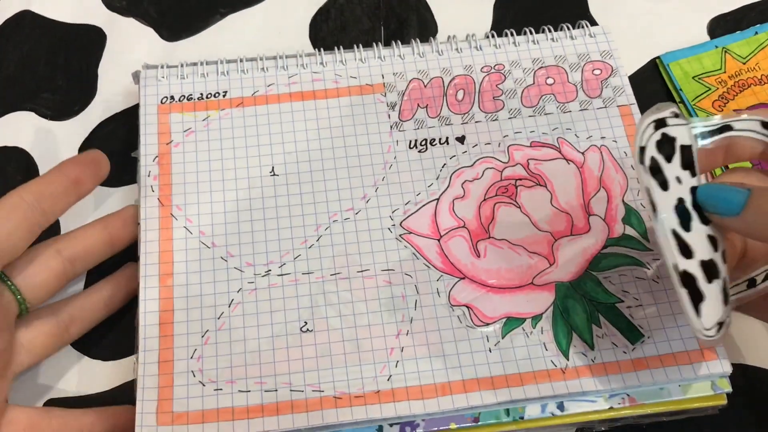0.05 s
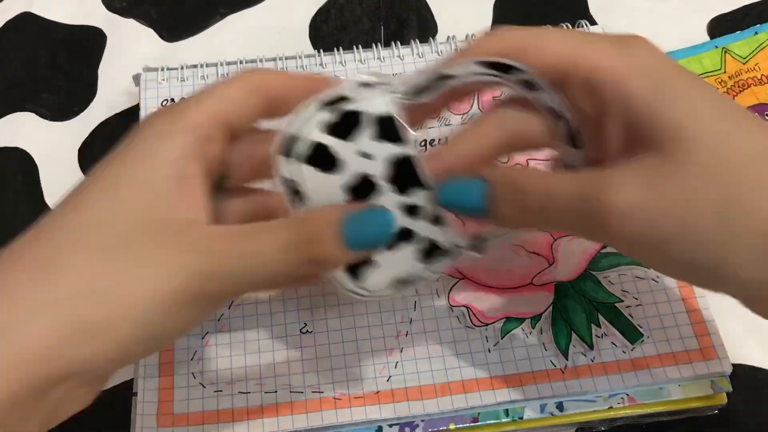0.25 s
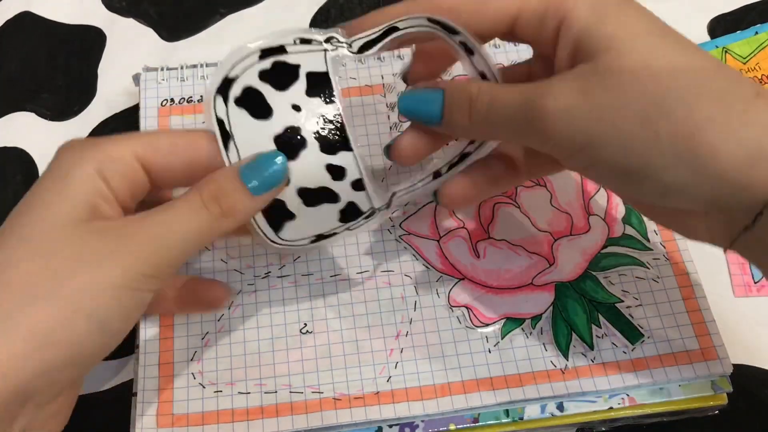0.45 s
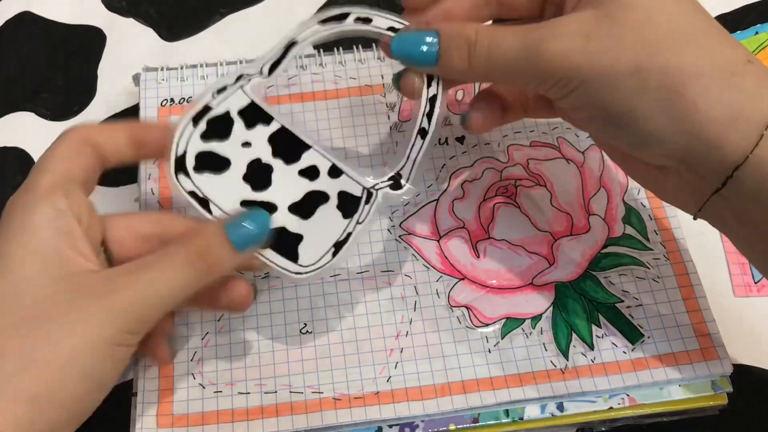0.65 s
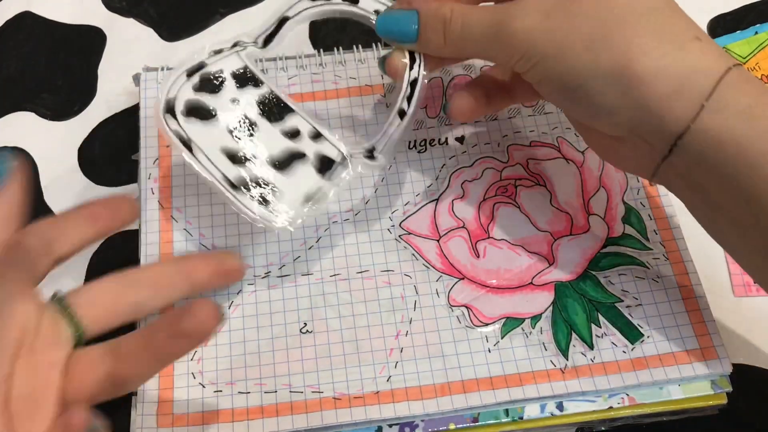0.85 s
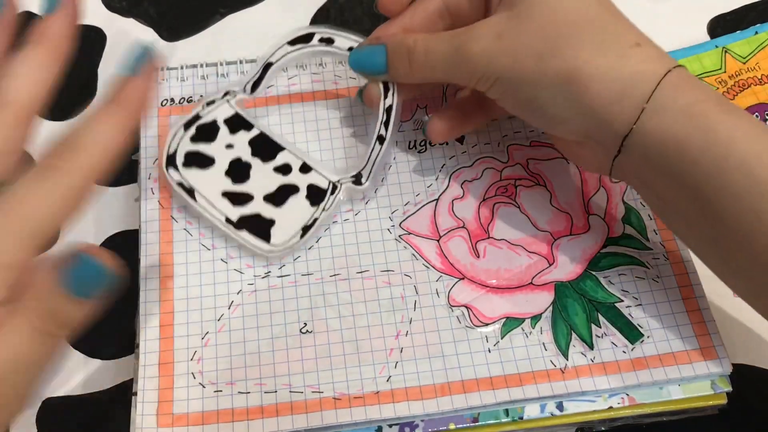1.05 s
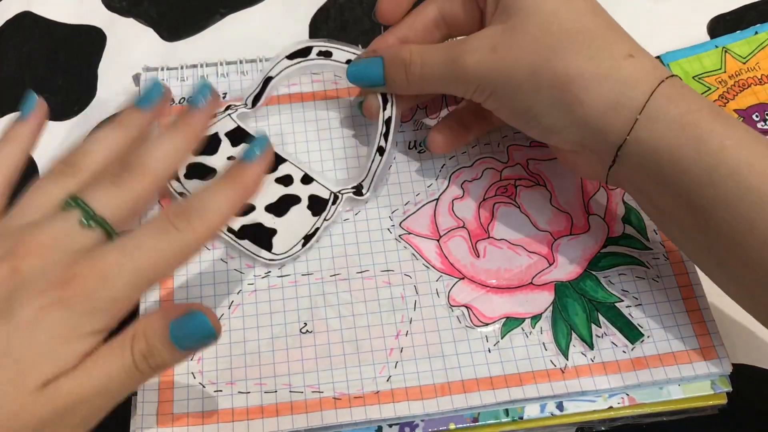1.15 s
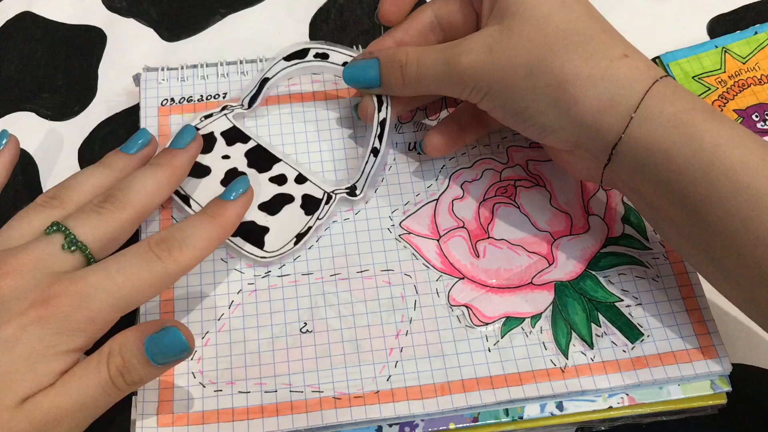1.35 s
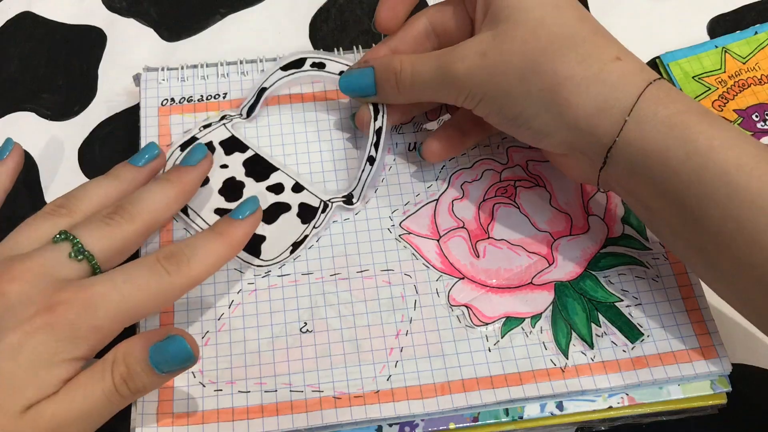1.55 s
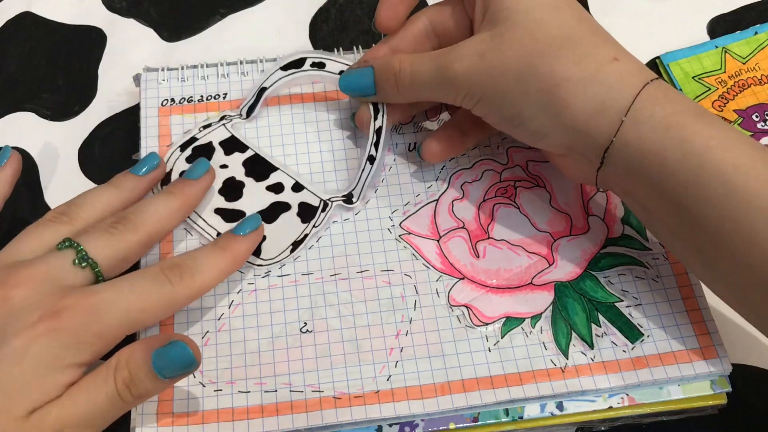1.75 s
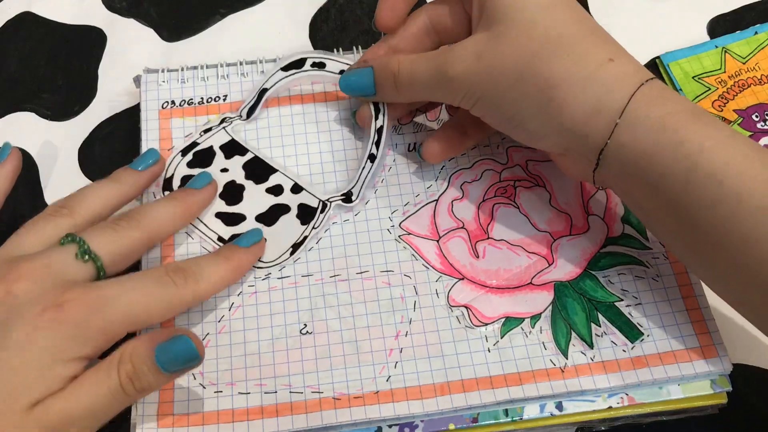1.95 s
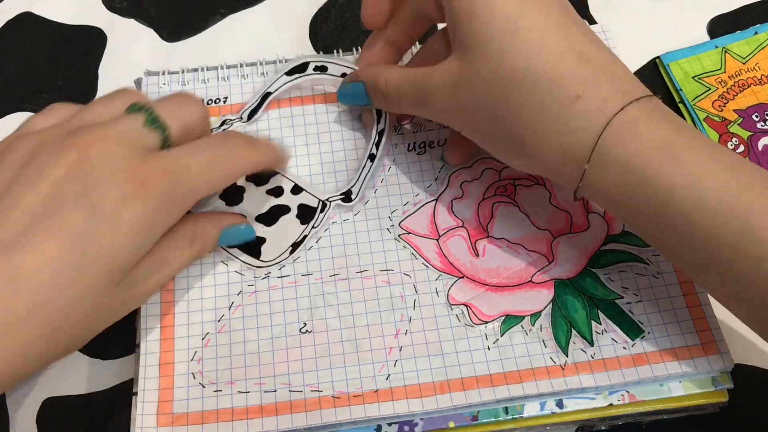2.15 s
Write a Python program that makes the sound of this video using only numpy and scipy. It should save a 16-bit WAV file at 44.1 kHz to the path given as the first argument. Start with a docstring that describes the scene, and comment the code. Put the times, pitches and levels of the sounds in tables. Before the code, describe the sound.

Close, dry paper crackling with sharp pops, short rustly drags and soft low flaps, followed by a cluster of light taps on a page; afterwards only faint finger rubs, a distant knock and quiet room air.

```python
"""Paper sticker handled over a notebook

A stiff paper sticker in a small, quiet room: finger drags are grip-modulated trains of tiny slips,
buckling snaps are pushes dispersed as bending waves, flaps are damped low thumps.
Edge taps lay it down as ticks; fingertip strokes are soft shaped noise.
A faint knock farther off is decaying modes plus noise; steady room air lies under it all."""
import sys
import numpy as np
from scipy import signal
from scipy.fft import rfft, irfft, next_fast_len
from scipy.io import wavfile

SR = 44100
rng = np.random.default_rng(int(sys.argv[2]) if len(sys.argv) > 2 else 0)


def generate_wav(sig):
    """Save sig (samples, or channels by samples) to the path in sys.argv[1] as 16-bit PCM at SR."""
    pcm = np.round(np.clip(np.atleast_2d(sig).T, -1, 1) * 32767).astype(np.int16)
    wavfile.write(sys.argv[1], SR, pcm)


N = 97020


def amp(db):
    """Amplitude of a level in dB."""
    return 10 ** (np.asarray(db) / 20)


def unit_rms(x):
    """Scale to rms 1."""
    return x / np.sqrt(np.mean(x ** 2) + 1e-20)


def unit_energy(x):
    """Scale to energy 1."""
    return x / np.linalg.norm(x)


def along(points, hz):
    """Interpolate (freq_hz, value) points on a log frequency axis."""
    point_hz, value = np.transpose(points)
    return np.interp(np.log(hz + 1), np.log(point_hz + 1), value)


def filtered(x, response):
    """Multiply the spectrum of x by a zero-phase response of frequency."""
    size = next_fast_len(N + SR // 2)
    hz = np.fft.rfftfreq(size, 1 / SR)
    return irfft(rfft(x, size) * response(hz), size)[:N]


def coloured(x, spectrum):
    """Shape x by a (freq_hz, level_db) spectrum, at rms 1."""
    return unit_rms(filtered(x, lambda hz: amp(along(spectrum, hz))))


def add(out, start_s, x):
    """Mix x into out at start_s."""
    part = out[max(round(start_s * SR), 0):][:len(x)]
    part += x[:len(part)]


# steady air spectrum: freq_hz, density_db (relative, per Hz)
AIR_SPECTRUM = [(25, -47), (50, -18.5), (84, 2.5), (125, -2.5), (170, -6.5), (230, -3.5), (400, -5.5),
                (650, -10.5), (900, -13.5), (1400, -16.5), (2800, -19.5), (5000, -22.5), (8000, -25),
                (12000, -26), (16000, -30)]
AIR_DB = -68.5


def room_air():
    """Steady air of the room: stationary coloured noise."""
    return amp(AIR_DB) * coloured(rng.standard_normal(N), AIR_SPECTRUM)


def burst(life_s, size=4096):
    """Exponentially dying noise of energy 1; life_s is the 1/e time."""
    decay = np.exp(-np.arange(size) / SR / life_s)
    return unit_energy(rng.standard_normal(size) * decay)


BEND_LAG_1KHZ_S, BEND_POWER = 0.000596, 1.01  # lag grows toward the bass by this power
PATCH_HALF_WIDTH_OCTAVES = 0.26


def bend(push, spectrum, bright_db_per_octave=0, patch_hz=None, patch_db=0, size=8192):
    """Bending wave in the sheet: the coloured push arrives treble first, bass last, at energy 1."""
    hz = np.fft.rfftfreq(size, 1 / SR)
    khz = np.maximum(hz, 70) / 1000
    level_db = along(spectrum, hz) + bright_db_per_octave * np.log2(np.maximum(khz, 1))
    if patch_hz:
        octaves_off = np.log2((hz + 1) / patch_hz)
        level_db = level_db + patch_db / (1 + (octaves_off / PATCH_HALF_WIDTH_OCTAVES) ** 2)
    # minimum phase: fold the cepstrum onto positive time
    cepstrum = irfft(np.log(amp(level_db)))
    cepstrum[1:size // 2] *= 2
    cepstrum[size // 2 + 1:] = 0
    # phase lag = integral of the group delay
    lag_rad = 2 * np.pi * np.cumsum(BEND_LAG_1KHZ_S / khz ** BEND_POWER) * SR / size
    response = np.exp(rfft(cepstrum) - 1j * lag_rad)
    return unit_energy(irfft(rfft(push, size) * response)[:size // 2])


# low body of a snap or tap: freq_hz, density_db (relative, per Hz)
BODY_SPECTRUM = [(25, -50), (60, -26.5), (150, -10), (330, -5.5), (550, 3.5), (760, -4), (900, -3),
                 (1400, -9), (2500, -32.5), (8000, -50.5)]
LEAD_LIFE_S, LEAD_DB, LEAD_SAMPLES = 0.00078, -3.5, 256  # fibres slip before the push
FIBRE_LIFE_S, FIBRE_DB = 0.00082, -6  # fibres give way after it
RING_LIFE_S, RING_DB = 0.0072, -10.5  # the sheet rings on
SPRAY_DB_PER_DB, SPRAY_FULL_DB = 0.092, -8  # stronger clicks tear more fibres; 0 dB spray gain at FULL


def click(energy_db, spectrum, bright_db_per_octave, body_db, patch_hz=None, patch_db=0):
    """Fibres slip ever harder, one sharp push follows, and the spray dies into a short ring."""
    spray = amp(SPRAY_DB_PER_DB * (energy_db - SPRAY_FULL_DB))
    before = spray * amp(LEAD_DB) * burst(LEAD_LIFE_S, size=LEAD_SAMPLES)[::-1]
    after = spray * amp(FIBRE_DB) * burst(FIBRE_LIFE_S) + amp(RING_DB) * burst(RING_LIFE_S)
    after[0] = 1
    push = unit_energy(np.concatenate([before, after]))
    crack = bend(push, spectrum, bright_db_per_octave, patch_hz, patch_db)
    body = amp(body_db) * bend(push, BODY_SPECTRUM)
    return amp(energy_db) * (crack + body)


# buckling snaps, energy before body is added:
# push_s, energy_db, bright_db_per_octave (above 1 kHz), body_db (re crack), patch_hz, patch_db
SNAPS = [(0.0394, -42, 0, -20, 4200, 9), (.093, -39, 1.5, -12, 12500, 2),
         (0.1064, -31.5, -1, -7, 11700, 5.5), (0.1238, -37.5, -3, -2, 7500, 29),
         (0.1509, -24.5, 11, -38, 11300, 6), (0.2024, -28.5, 3.5, -39, 6300, 21),
         (.2055, -26, 1, -42, 4560, 9), (.213, -29.5, 3, -27, 11840, 1), (0.2199, -29, 7, -22, 9500, 3),
         (0.2421, -15, 2.5, -6.5, 3080, 10), (0.245, -19, -2.5, -8.5, 6000, 11),
         (.2477, -19, -1.5, -27, 11000, 5.5), (.299, -38, 2.5, -20, 11040, -6),
         (.307, -29.5, 1, -26, 14100, 9), (0.3337, -27, 1, -2.5, 2240, 6), (0.3426, -30, 0, -11, 12900, -5),
         (.362, -25.5, 1.5, -8.5, 2000, 8.5), (.374, -28, 4, -23, 12000, -1),
         (0.3809, -26, 0, -30, 6000, 9), (0.4057, -17, -1, -18, 12470, 9), (.408, -14, 2, -25, 6400, 5),
         (0.4184, -4.5, -2, -16, 2700, 3), (0.4308, -18, 3.5, -4, 2490, 18),
         (0.4338, -13.5, 5.5, -26, 13500, 11), (0.4524, -9, 2.5, -12, 2910, 10.5),
         (0.475, -20, 1, -28, 15000, -1), (0.4797, -8, 3, -14.5, 2700, -1),
         (.513, -35.5, 1, -19.5, 11000, 3), (0.5489, -34, -0.5, -29, 12000, 2),
         (0.5693, -24.5, -1.5, -11.5, 3013, 12), (.580, -18, 1.5, -10.5, 12500, 5),
         (.594, -29, 4.5, -20, 14000, 3), (0.6048, -18, 2, -37, 13500, 21),
         (.611, -22, 4, -27.5, 13500, 13), (0.618, -23, 10, -32, 13100, 12),
         (0.6339, -8, 2, -15.5, 2630, 1.5), (.648, -25, 4.5, -12.5, 12000, 3),
         (0.652, -32, 8, -30, 13500, 6), (0.655, -14.5, -3, -26, 5370, 31),
         (0.6598, -12.5, -2, -25, 7500, 21), (0.6607, -2, -1, -14.5, 14940, 11.5)]
# crack of the sheet: freq_hz, density_db (relative, per Hz)
CRACK_SPECTRUM = [(300, -46.5), (1400, -15.5), (1750, 2), (3000, 2.5), (3700, -0.5), (5400, 1),
                  (6800, -8.5), (9000, 0), (12000, 0.5), (15800, -2), (18000, -38)]
# sheet modes, before scatter: freq_hz, level_db (relative), t60_s
SHEET_MODES = [(533, -3.5, 0.15), (729.3, -2, 0.12), (2060, -6, .06), (3050, 2, .08)]
SHEET_DB = -23  # sheet ring re snap
MODE_SCATTER_DB, MODE_SCATTER_RATIO = 2, 0.0091  # standard deviations of level, pitch


def sheet_ring():
    """Decaying modes of the whole sheet, scattered per snap, at energy 1."""
    t = np.arange(SR // 5) / SR
    ring = np.zeros(len(t))
    for freq_hz, level_db, t60_s in SHEET_MODES:
        level = amp(level_db + MODE_SCATTER_DB * rng.normal() - 60 * t / t60_s)
        mode_hz = freq_hz * (1 + MODE_SCATTER_RATIO * rng.normal())
        ring += level * np.sin(2 * np.pi * mode_hz * t)
    return unit_energy(ring)


def snaps():
    """A patch of the sticker buckles as a dispersed click and the whole sheet rings faintly."""
    out = np.zeros(N)
    for push_s, energy_db, bright_db_per_octave, body_db, patch_hz, patch_db in SNAPS:
        crack = click(energy_db, CRACK_SPECTRUM, bright_db_per_octave, body_db, patch_hz, patch_db)
        add(out, push_s - LEAD_SAMPLES / SR, crack)
        add(out, push_s, amp(energy_db + SHEET_DB) * sheet_ring())
    return out


# drags, final level before grip:
# release_s, buildup_s, final_db, swell_db, bright_db_per_octave (above 1 kHz)
DRAGS = [(0.155, 0.055, -55.5, 4, 0.5), (0.2441, 0.021, -35.5, 26.5, -1.5), (.409, 0.054, -49, 4.5, 0.5),
         (0.479, 0.051, -46, 7.5, -3), (0.581, 0.015, -48, 9.5, 0.5), (.633, 0.067, -49.5, 15.5, 1.5),
         (0.642, .009, -35, -1.5, 2), (0.663, 0.022, -33, 7.5, 1), (0.773, 0.023, -66, 4, -3.5),
         (0.877, 0.02, -60.5, 24, -5), (1.81, .06, -76, 1, 5.5), (2.163, 0.057, -70.5, 10, 0.5)]
# slips of paper under fingers: freq_hz, density_db (relative, per Hz)
DRAG_SPECTRUM = [(100, -17.5), (600, -5.5), (1300, -9), (2000, -5.5), (3800, -2), (5400, -0.5), (7000, 1),
                 (9500, -1.5), (13000, 3), (16000, -1)]
SLIPS_PER_S, SLIP_SPREAD_DB = 6000, 6.5
GRIP_PER_S, GRIP_SPREAD_DB = 350, 3  # grip catches and eases
EDGE_FADE_S = 0.0016  # 1/e fade outside the build-up


def drags():
    """Dense tiny slips change level by swell_db as the paper is pulled, and stop when it lets go."""
    out, t = np.zeros(N), np.arange(N) / SR
    for release_s, buildup_s, final_db, swell_db, bright_db_per_octave in DRAGS:
        outside_s = np.maximum(release_s - buildup_s - t, 0) + np.maximum(t - release_s, 0)
        swell = amp(final_db + swell_db * np.minimum((t - release_s) / buildup_s, 0))
        knots = rng.standard_normal(int(N * GRIP_PER_S / SR) + 2)
        grip = amp(GRIP_SPREAD_DB * np.interp(t * GRIP_PER_S, np.arange(len(knots)), knots))
        slip_here = rng.random(N) < SLIPS_PER_S / SR
        slip_size = amp(SLIP_SPREAD_DB * np.clip(rng.standard_normal(N), -2, 2))
        slips = slip_here * slip_size * np.sign(rng.standard_normal(N))
        spectrum = [(hz, db + bright_db_per_octave * np.log2(max(hz / 1000, 1)))
                    for hz, db in DRAG_SPECTRUM]
        out += swell * np.exp(-outside_s / EDGE_FADE_S) * grip * coloured(slips, spectrum)
    return out


# whole sheet springs over: start_s, energy_db, pitch_hz
FLAPS = [(.2425, -21.5, 138), (.334, -25.5, 400), (.419, -30, 150), (.432, -32, 120), (.4795, -24, 124),
         (0.582, -31.5, 150), (.635, -28.5, 170), (0.6627, -20.5, 126)]
FLAP_Q, FLAP_TOP_HZ = 1.5, 604
WOBBLE_LIFE_S, WOBBLE_DB = 0.015, -11  # brief wobble after the push


def flaps():
    """The sheet springs over and shoves the air: a heavily damped low thump."""
    out, hz = np.zeros(N), np.geomspace(20, 16000, 60)
    for start_s, energy_db, pitch_hz in FLAPS:
        push = amp(WOBBLE_DB) * burst(WOBBLE_LIFE_S)
        push[0] = 1
        resonance = 1 + (FLAP_Q * (hz / pitch_hz - pitch_hz / hz)) ** 2
        top_cut = 1 + (hz / FLAP_TOP_HZ) ** 4
        thump_db = -10 * np.log10(resonance * top_cut)
        add(out, start_s, amp(energy_db) * bend(push, np.column_stack([hz, thump_db])))
    return out


# sticker edge on the page, energy before body is added:
# push_s, energy_db, bright_db_per_octave (above 1 kHz), body_db (re tick)
TAPS = [(0.8125, -36.5, -5.5, -7), (.822, -33.5, 17, -12), (.852, -34, -2, -13), (0.8586, -32, 1, -25),
        (0.865, -30.5, -2.5, -9.5), (0.8679, -32, -4.5, -14), (0.8723, -21, 1.5, -24),
        (0.8745, -22, -0.5, -16), (0.8783, -31.5, -6, 2), (1.8883, -50.5, 9, -20)]
# tick of the edge: freq_hz, density_db (relative, per Hz)
TAP_SPECTRUM = [(300, -29), (1400, -5), (2500, -3), (4000, -0.5), (5800, 2), (7800, 2), (10000, -5.5),
                (15500, -14), (18000, -50)]


def taps():
    """The sticker's edge taps down on the notebook: a cluster of ticks, then a late faint one."""
    out = np.zeros(N)
    for push_s, energy_db, bright_db_per_octave, body_db in TAPS:
        tick = click(energy_db, TAP_SPECTRUM, bright_db_per_octave, body_db)
        add(out, push_s - LEAD_SAMPLES / SR, tick)
    return out


# fingertip strokes: middle_s, half_length_s, peak_db
STROKES = [(1.464, 0.023, -64), (2.18, .06, -76)]
# skin on paper: freq_hz, density_db (relative, per Hz)
SKIN_SPECTRUM = [(300, -14), (2700, -15), (3500, 1), (4300, -1.5), (5300, -10), (7200, -7.5), (10000, -17),
                 (16000, -27)]


def smoothing():
    """A fingertip slides softly over the sticker: friction noise that swells and fades."""
    t = np.arange(N) / SR
    level = np.zeros(N)
    for middle_s, half_length_s, peak_db in STROKES:
        level += amp(peak_db) / (1 + ((t - middle_s) / half_length_s) ** 2)
    return level * coloured(rng.standard_normal(N), SKIN_SPECTRUM)


# modes of the knocked object: freq_hz, level_db (relative), t60_s
KNOCK_MODES = [(411, 2.5, 0.17), (1000, 4, 0.1), (1100, -6, 0.17), (1610, -12, 0.16), (1930, -8.5, .14)]
# diffuse part of the knock: freq_hz, density_db (relative, per Hz)
KNOCK_SPECTRUM = [(100, -30), (350, -3.5), (1100, -10), (2000, -13), (3000, -25.5), (6000, -22.5),
                  (12000, -44)]
KNOCK_S, KNOCK_DB, KNOCK_RISE_S = 1.631, -56, 0.0084
WASH_DB, WASH_T60_S = -3, 0.24  # diffuse noise, re KNOCK_DB


def knock():
    """A faint hollow knock: decaying modes and noise, the attack blurred by distance."""
    t = np.maximum(np.arange(N) / SR - KNOCK_S, 0)
    ring = np.zeros(N)
    for freq_hz, level_db, t60_s in KNOCK_MODES:
        ring += amp(level_db - 60 * t / t60_s) * np.sin(2 * np.pi * freq_hz * t)
    wash = amp(WASH_DB - 60 * t / WASH_T60_S) * coloured(rng.standard_normal(N), KNOCK_SPECTRUM)
    attack = (1 - np.exp(-t / KNOCK_RISE_S)) ** 2
    return amp(KNOCK_DB) * (ring + wash) * attack


# reverberation time: freq_hz, t60_s
ROOM_DECAY = [(100, 0.13), (600, 0.18), (2000, 0.22), (6000, .15), (15000, 0.13)]
# reverberation level: freq_hz, level_db
ROOM_LEVEL = [(100, -12.5), (600, -12.5), (2000, -18.5), (6000, -16.5), (15000, -18)]
ROOM_DELAY_S = 0.004


def room(x):
    """Short answer of a furnished room: convolution with noise decaying per frequency."""
    hz, t, noise = signal.stft(rng.standard_normal(SR // 2), SR, nperseg=256)
    decay = amp(-60 * t / along(ROOM_DECAY, hz)[:, None])
    tail = unit_energy(signal.istft(noise * decay, SR, nperseg=256)[1])
    out = np.zeros(N)
    add(out, ROOM_DELAY_S, signal.fftconvolve(x, tail))
    return filtered(out, lambda f: amp(along(ROOM_LEVEL, f)))


def scene():
    """Paper and knock, direct and through the room, over steady air."""
    direct = snaps() + drags() + flaps() + taps() + smoothing() + knock()
    return (direct + room(direct) + room_air())[None]


LOW_CUT_HZ, TOP_HZ = 53, 16100


def record(dry):
    """The microphone rolls off the deep bass; nothing is kept above the band limit."""
    low_cut = signal.butter(3, LOW_CUT_HZ, "highpass", fs=SR, output="sos")
    thin = signal.sosfilt(low_cut, dry[0])
    return filtered(thin, lambda hz: hz < TOP_HZ)[None]


dry = scene()
out = record(dry)
generate_wav(out)
```